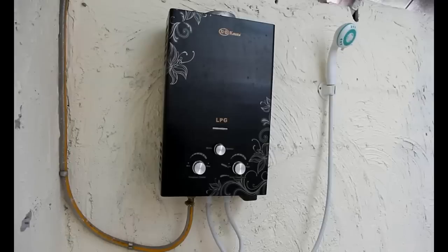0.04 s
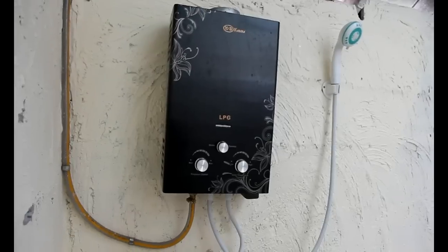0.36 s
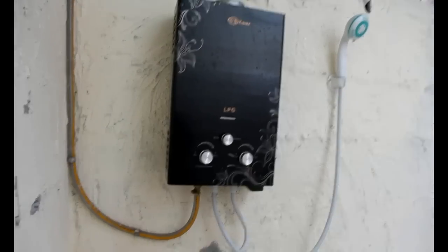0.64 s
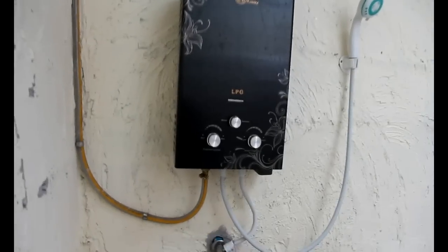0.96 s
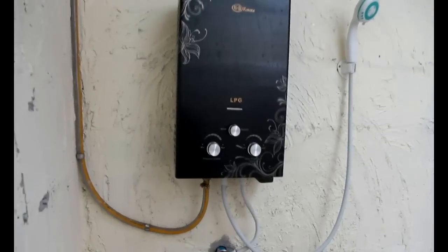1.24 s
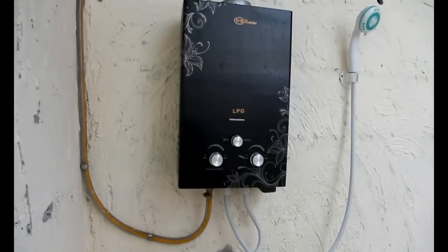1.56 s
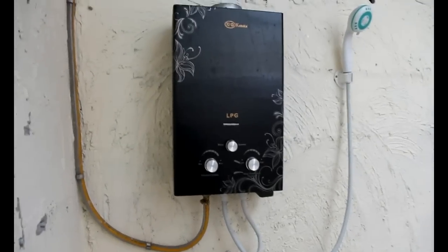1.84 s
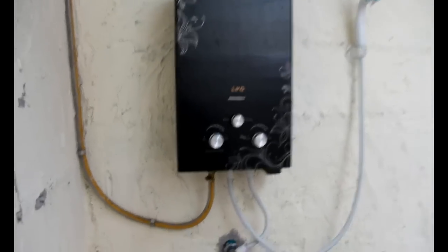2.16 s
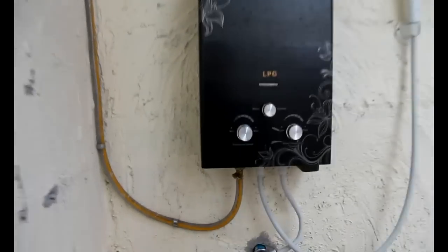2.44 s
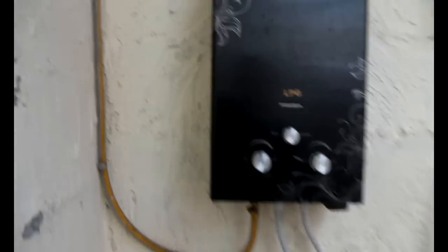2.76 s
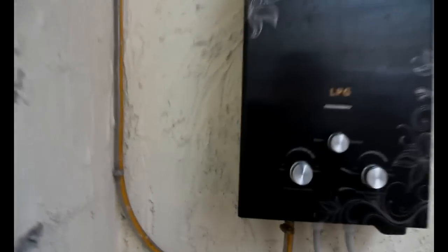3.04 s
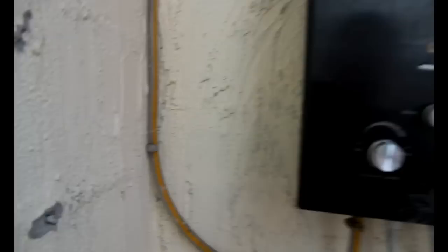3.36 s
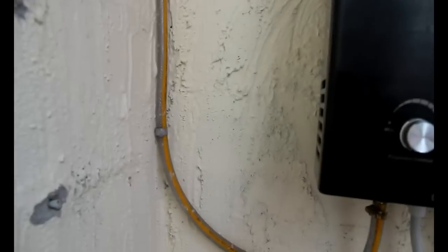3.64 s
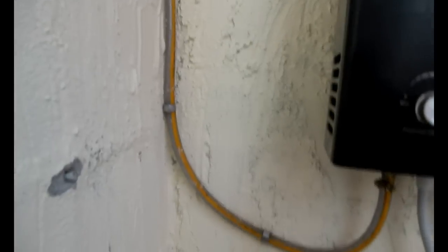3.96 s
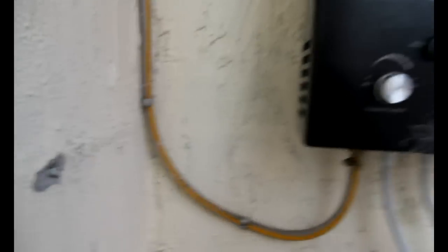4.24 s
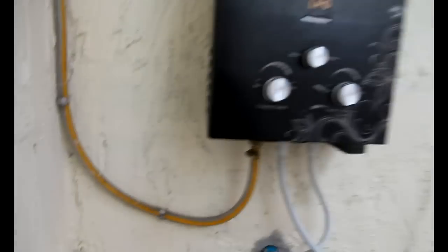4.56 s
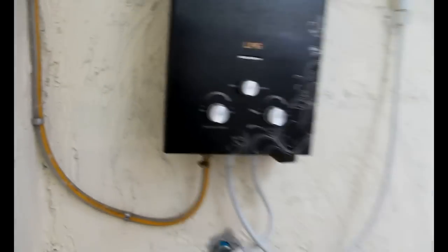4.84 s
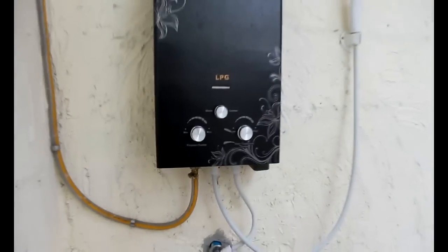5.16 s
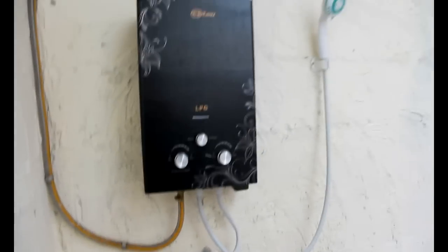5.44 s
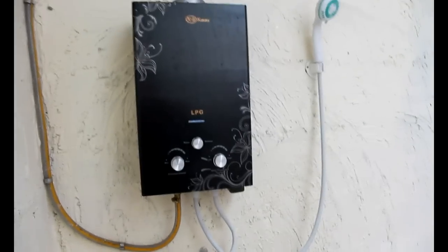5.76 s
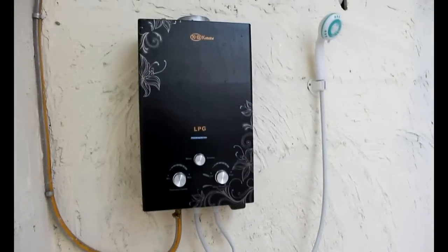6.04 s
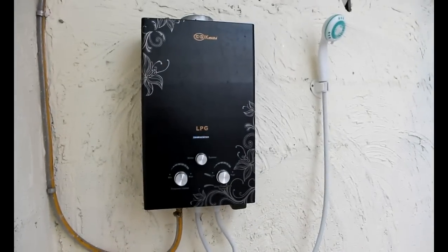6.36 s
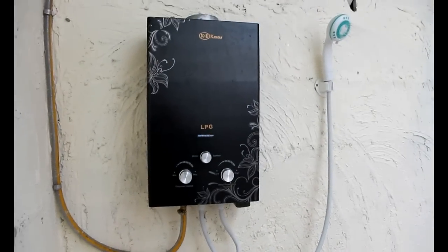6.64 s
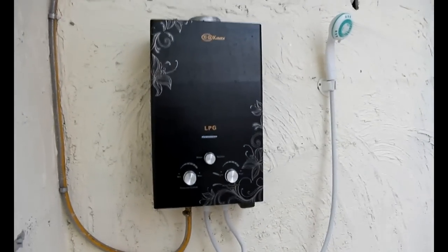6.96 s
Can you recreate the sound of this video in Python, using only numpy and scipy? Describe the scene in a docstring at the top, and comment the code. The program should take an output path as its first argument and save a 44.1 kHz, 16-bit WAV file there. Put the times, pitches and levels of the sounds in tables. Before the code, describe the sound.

In a small bathroom with a short echo, a hand-held microphone picks up faint rustling clothes, light clicks and dull bumps. Halfway through, a tap opens with a knock and water rushes out, splashing and sputtering. A sharp metallic clack comes from a gas water heater, and moments later the burner lights with a hollow whump. The flame rumbles on softly while the water hisses, spits and squeaks with escaping air.

```python
"""A gas water heater lights in a small, hard-walled bathroom: its valve clacks, the gas catches with
a whump, and the flame rumbles on, shaking the air inside the casing. Just before that, a tap knocks
open and water gushes out, then spatters as pockets of air burst from the pipe.
The scene opens with quiet shuffling, ticks and bumps, all heard by a hand-held microphone."""
import sys
import numpy as np
from scipy import signal
from scipy.fft import rfft, irfft
from scipy.io import wavfile
from scipy.ndimage import uniform_filter1d

SR = 44100
rng = np.random.default_rng(int(sys.argv[2]) if len(sys.argv) > 2 else 0)


def wav_record(signal):
    """Record a signal, one row per channel, as 16-bit PCM in the file named by sys.argv[1]."""
    frames = np.transpose(np.atleast_2d(signal))
    bounded = np.clip(frames, -1, 1)
    # unit amplitude maps onto the largest positive 16-bit level
    quanta = np.round(bounded * 32767).astype(np.int16)
    wavfile.write(sys.argv[1], SR, quanta)


N = 317520
TIME, FREQS = np.arange(N) / SR, np.fft.rfftfreq(N, 1 / SR)

# Notes at which the air in the casing and flue (exhaust pipe) rings: pitch_hz, width_hz, level_db
CASING_NOTES = [(31.8, 6.9, -15.5), (78.4, 10.5, -8), (151.7, 8.7, 0.5), (213.8, 6, 4.5), (240.7, 16.4, -2),
                (269, 30, -6.5), (318, 8.2, 2.5), (390.5, 7.2, 0), (429, 9.8, -10.5), (502, 72.3, -17.5)]
# Puffs of gas catching along the burner: start_s, level_db, burn_s
PUFFS = [(5.438, -17, 0.053), (5.5, -22, .03), (5.541, -17, 0.04), (5.72, -36, 0.042)]
# Tone (how strong the lows and highs are) of the flame, a puff's hiss and the flue: pitch_hz, level_db
ROAR_TONE = [(15, -14), (35, 0.5), (420, -7.0), (900, 3), (2500, -10), (8000, -40)]
FLARE_TONE = [(250, -23), (550, 3), (1300, -4), (2500, -7), (8000, -28)]
FLUE_TONE = [(15, -8), (32, -1), (70, -4), (105, 3), (170, -22), (400, -57)]
# Hot gas starting up the flue: start_s, level_db, rise_s, settle_s
DRAUGHT = (5.5, -35.5, 0.03, 0.2)
# Gas valve and tap knocks: start_s, ring_db, fade_s, crack_db, echo_db, rows of (pitch_hz, level_db)
# Here and below, fade_s is the time a sound takes to drop by 60 dB.
VALVE_CLACK = (4.8355, -0.9, 0.042, 0, -2, [(240, -45), (600, -33), (850, -14), (1200, -7), (1750, -3),
               (2400, -2), (3500, -4), (4500, -12.5), (5500, -9), (7500, -15), (11000, -17)])
TAP_KNOCK = (3.668, -29, 0.1, -28, 0, [(120, -43.5), (200, -4), (360, -5.5), (818, -16.5), (935, -2.5),
             (1120, -10), (1240, -8.5), (1380, -13), (2060, -10), (5170, -24), (11000, -21), (14300, -59),
             (22000, -120)])
# Tone of the crack as metal first hits metal: pitch_hz, level_db
CRACK_TONE = [(500, -37), (1500, -9), (4500, -11), (5800, 12), (8000, 6.5), (11000, -8)]
# Tone of water rushing in the pipe, splashing and spraying: pitch_hz, level_db
RUSH_TONE = [(40, -21), (130, -6), (300, 4.5), (520, -3.5), (750, -1), (1150, 1), (1600, -1.5), (2400, -10),
             (5000, -62)]
SPLASH_TONE = [(700, -20), (1300, -14), (1900, -1), (2900, -1.5), (4200, -1.5), (5400, -2.5), (7000, -6.5),
               (11000, -14.5)]
SPRAY_TONE = [(2000, -27.5), (4500, -11), (6300, -6), (8700, -1.5), (10000, -0.2), (11200, -1.5)]
# How each of these three builds up and settles: start_s, steady_db, gush_db, rise_s, halving_s
RUSH_FLOW = (3.81, -41, -33, .12, .075)
SPLASH_FLOW = (3.82, -38, -21.3, .145, .13)
SPRAY_FLOW = (3.92, -30, -21.5, .175, .13)
# The water's loudness drifting as the microphone moves: time_s, rush_and_splash_db, spray_db
WATER_DRIFT = [(4.3, -1.5, 0.5), (4.7, .5, -0.5), (4.95, 1, -3.5), (5.3, -0.5, -1.5), (5.7, 1, .5),
               (6.1, -3, .5), (6.25, -2.5, 4.5), (6.7, -1, 1), (7.2, 1, 0)]
# Air pockets spitting out with the water: start_s, length_s, splash_db, spray_db
SPURTS = [(3.864, .06, -36, -43), (4.313, 0.022, -25.5, -23), (4.384, 0.019, -30, -25.5),
          (4.465, 0.0085, -35, -22.5), (4.511, 0.02, -29.5, -18), (4.667, 0.008, -30.5, -27),
          (4.698, 0.031, -37, -28), (5.001, 0.0337, -32, -25.5), (5.052, 0.0178, -30, -39),
          (5.148, 0.0099, -28, -21), (5.262, 0.0115, -29.5, -22.5), (5.365, 0.036, -32, -22),
          (6.089, 0.0245, -31, -17.5), (6.141, 0.019, -29.5, -19), (6.24, 0.0414, -24.5, -18.5),
          (6.371, 0.051, -28, -29.5), (6.505, 0.02, -49, -22), (6.59, 0.0091, -44, -26),
          (6.703, .025, -49, -28.5), (6.806, 0.039, -60, -27), (6.91, 0.013, -40.5, -30),
          (7.109, 0.02, -27, -38)]
# Bubbles and squeaks of escaping air: start_s, length_s, level_db, pitch_hz, width_hz
SQUEAKS = [(4.513, 0.034, -27, 8680, 600), (5.885, 0.025, -34.5, 2020, 220), (5.957, 0.013, -37, 3300, 300),
           (6.097, .018, -26.5, 9960, 250), (6.152, 0.013, -32, 2153, 300), (6.241, 0.026, -21, 8960, 70),
           (6.262, 0.0144, -18, 8000, 60), (6.265, 0.0104, -43, 2026, 200), (6.372, 0.0154, -27, 4240, 700),
           (6.101, .018, -34, 2650, 600), (6.143, .016, -32, 5100, 450), (6.918, 0.015, -31, 6300, 900),
           (6.621, 0.018, -36, 2200, 500), (6.793, 0.016, -33.5, 2670, 250),
           (7.111, 0.027, -30.5, 3300, 910)]
# Small handling ticks: start_s, peak_db, pitch_hz, half_width_octaves
TICKS = [(0.162, -25.5, 5000, 1.2), (.163, -33, 1440, .4), (.378, -32, 1370, 0.34), (.447, -30, 4300, .5),
         (0.536, -37.5, 5200, .2), (3.486, -39.5, 6970, .35)]
# Soft bumps: start_s, level_db, pitch_hz, fade_s, rattle_db (relative to the thud)
BUMPS = [(0.265, -22, 368, 0.0316, -32), (.811, -31.5, 264, 0.108, -2.5), (.826, -35, 200, 0.08, -5),
         (1.981, -33.5, 243.7, 0.096, -9), (2.357, -26, 232.2, 0.064, -6.5)]
# Notes of the unlit casing: pitch_hz, width_hz, level_db
HUM_NOTES = [(128, 22, -2), (232, 30, 0), (370, 60, -7)]
# The hum swelling while the microphone is near the casing: start_s, length_s, level_db
HUM_SWELL = (2.85, 1.9, -49)
# Movements of clothes and feet: start_s, length_s, level_db
SHUFFLES = [(0.332, 0.35, -47.5), (.73, .2, -46), (.89, .29, -42.5), (1.304, .35, -46), (1.828, .35, -46),
            (2.2, 0.76, -52), (2.98, .5, -49)]
# A sole scuffing the floor: start_s, length_s, level_db, first_hz, last_hz
SCUFF = (1.995, .09, -41.5, 1000, 1950)
# Tone of a bump's rattle, the shuffling and the quiet room: pitch_hz, level_db
RATTLE_TONE = [(60, -4), (150, 10.5), (600, 1), (1400, -6.5), (2100, -1), (3200, -13), (10000, -21.5)]
SHUFFLE_TONE = [(71, -20), (120, -4.5), (303, -14), (339, -8), (477, -9.5), (622, -2), (723, -8),
                (1020, -5), (11000, -21.5), (14300, -61), (22000, -120)]
ROOM_TONE = [(15, -50), (25, -40), (64, 4), (92, -4.5), (115, -1), (412, -10.5), (635, -16.5), (819, -11),
             (954, -19), (1300, -17.5), (1630, -18.5), (2000, -20), (11000, -31), (14300, -72),
             (22000, -120)]
# How long the walls echo: pitch_hz, fade_s
WALL_ECHO = [(100, 0.5), (400, 0.71), (1500, 0.42), (3000, 0.41), (6000, 0.2), (11000, 0.28)]


def burner():
    """Puffs of catching gas make the air in the casing ring; the swirling flame keeps it rumbling."""
    casing = sum(gain_of(db) / (1 + 2j * (FREQS - hz) / width) * (-1) ** k
                 for k, (hz, width, db) in enumerate(CASING_NOTES))
    roar = with_tone(shaped_noise(casing, N), ROAR_TONE)
    roar /= np.sqrt(uniform_filter1d(roar ** 2, size=1800) + 1e-6)  # steady gas keeps the roar even
    light_s = 5.36  # the flame spreads, burns high, then calms down
    flame = gain_of(-44.5) * ramp(light_s, 0.026) + surge(light_s, db=-31.5, rise_s=0.084, settle_s=0.36)
    ringing, burning, t = np.zeros(N), np.zeros(N), np.arange(SR // 2) / SR
    for start_s, puff_db, burn_s in PUFFS:
        onset = gain_of(puff_db) * (1 - np.exp(-t / 0.01))
        notes = sum(gain_of(db) * np.exp(-np.pi * width * t) * np.sin(2 * np.pi * (hz * t + rng.random()))
                    for hz, width, db in CASING_NOTES)
        add(ringing, start_s, gain_of(-3) * onset * notes / np.sqrt(2))
        add(burning, start_s, onset / (1 + (t / burn_s) ** 4))
    whump = ringing + burning * (roar + gain_of(-14.5) * noise(FLARE_TONE))
    bass_cut = signal.butter(2, 123, "high", fs=SR, output="sos")
    return flame * roar + signal.sosfilt(bass_cut, whump)


def flue():
    """Hot gas starts up the flue in deep throbs that soon die away."""
    start_s, _, rise_s, _ = DRAUGHT
    throbs_per_s, depth = 8.3, 0.46
    throb = 1 + depth * np.cos(2 * np.pi * throbs_per_s * (TIME - start_s - rise_s))
    return surge(*DRAUGHT) * throb * noise(FLUE_TONE)


def knock(start_s, ring_db, fade_s, crack_db, echo_db, tone):
    """The valve or tap hits with a sharp crack, and the pipe and sheet metal ring."""
    out, t = np.zeros(N), np.arange(SR // 2) / SR
    ring = gain_of(ring_db - 60 * t / fade_s) * noise(tone, len(t))
    crack = gain_of(crack_db - 60 * t / 0.017) * noise(CRACK_TONE, len(t))
    add(out, start_s, (ring + crack) * (1 - np.exp(-t / 0.0017)))
    return bathroom(out, echo_db)


def water():
    """Water churns in the pipe, splashes and bubbles on the floor, and throws a fine spray."""
    rush = with_tone(patter(per_s=8000, spread_db=2), RUSH_TONE) * waver(rate_hz=20, depth_db=2.5)
    drops = with_tone(patter(per_s=9000, spread_db=0.5), SPLASH_TONE) * waver(rate_hz=28, depth_db=1.9)
    splash = drops + gain_of(-9.5) * bubbles(per_s=820, spread_db=-0.5)
    spray = with_tone(patter(per_s=14000, spread_db=1), SPRAY_TONE) * waver(rate_hz=26, depth_db=1.5)
    times, splash_db, spray_db = np.transpose(WATER_DRIFT)
    stream = flow(*RUSH_FLOW) * rush + flow(*SPLASH_FLOW) * splash
    stream *= gain_of(np.interp(TIME, times, splash_db))
    stream += gain_of(np.interp(TIME, times, spray_db)) * flow(*SPRAY_FLOW) * spray
    return bathroom(stream * waver(rate_hz=21, depth_db=1.17), echo_db=-7)


def flow(start_s, steady_db, gush_db, rise_s, halving_s):
    """The water's strength: a steady stream, plus a gush as the pent-up water arrives."""
    gush_s, opening_s = 3.922, 0.058
    easing = 1 / (1 + (np.maximum(TIME - gush_s - rise_s, 0) / halving_s) ** 2)
    gush = gain_of(gush_db) * ramp(gush_s, rise_s) * easing
    return gain_of(steady_db) * ramp(start_s, opening_s) + gush


def bubbles(per_s, spread_db, sizes=40):
    """Bubbles of many sizes give short pings, each rising a little in pitch."""
    out, t = np.zeros(N), np.arange(SR // 25) / SR
    for hz in np.geomspace(900, 5500, sizes):
        ping = np.sin(2 * np.pi * hz * t * (1 + 3 * t)) * np.exp(-hz * t / 7) * np.sqrt(hz)
        out += signal.oaconvolve(patter(per_s / sizes, spread_db), ping)[:N]
    return unit_level(out)


def spurts():
    """Each air pocket bursts into droplets with a low gulp; some air squeaks on its way out."""
    out, t = np.zeros(N), np.arange(SR // 5) / SR
    hz = np.fft.rfftfreq(len(t), 1 / SR)
    for start_s, length_s, splash_db, spray_db in SPURTS:
        splash = gain_of(splash_db) * with_tone(patter(12000, 0.5, len(t)), SPLASH_TONE)
        spray = gain_of(spray_db) * with_tone(patter(18000, 1.5, len(t)), SPRAY_TONE)
        gulp = gain_of(splash_db - 10) * with_tone(patter(8000, 1.5, len(t)), RUSH_TONE)
        onset = (1 - np.exp(-t / 0.0028)) * (1 + .5 * np.exp(-t / 0.0058))
        add(out, start_s, (splash + spray + gulp) * onset / (1 + (t / length_s) ** 4))
    for start_s, length_s, db, pitch_hz, width_hz in SQUEAKS:
        squeak = shaped_noise(1 / (1 + (2 * (hz - pitch_hz) / width_hz) ** 2), len(t))
        squeak = unit_level(squeak[:max(int(length_s * SR), 64)])
        add(out, start_s, gain_of(db) * squeak * signal.windows.tukey(len(squeak), .4))
    return bathroom(out, echo_db=-3.5)


def handling():
    """Sharp ticks close to the microphone, and dull bumps with a little rattle."""
    ticks, bumps, t = np.zeros(N), np.zeros(N), np.arange(SR // 4) / SR
    octave = np.log2(np.fft.rfftfreq(len(t), 1 / SR) + 1)
    for start_s, db, hz, half_width in TICKS:
        band = 1 / (1 + ((octave - np.log2(hz)) / half_width) ** 2)
        tick = shaped_noise(band, len(t)) * t * np.exp(-t / 0.0015)
        add(ticks, start_s, gain_of(db) * tick / abs(tick).max())
    for start_s, db, hz, fade_s, rattle_db in BUMPS:
        thud = -np.sin(2 * np.pi * hz * t) * gain_of(-60 * t / fade_s)
        rattle = gain_of(rattle_db - 60 * t / 0.2) * noise(RATTLE_TONE, len(t))
        add(bumps, start_s, gain_of(db) * (1 - np.exp(-t / 0.0017)) * (thud + rattle))
    return bathroom(ticks, echo_db=-9) + bathroom(bumps, echo_db=-6)


def casing_hum():
    """Moving air hums faintly in the casing before the flame is lit."""
    casing = sum(gain_of(db) / (1 + (2 * (FREQS - hz) / width) ** 2) for hz, width, db in HUM_NOTES)
    return swell(*HUM_SWELL) * unit_level(shaped_noise(casing, N))


def shuffling():
    """Clothes and feet rustle, and a sole scuffs the floor once, rising in pitch."""
    rustle = with_tone(patter(per_s=14000, spread_db=0), SHUFFLE_TONE) * waver(rate_hz=36, depth_db=0.77)
    fidget = gain_of(-53.5) * (ramp(.15, .03) - ramp(3.45, 0.087))  # faint rustle between movements
    movement = np.sqrt(fidget ** 2 + sum(swell(*row) ** 2 for row in SHUFFLES))
    start_s, length_s, db, first_hz, last_hz = SCUFF
    grit = unit_level(uniform_filter1d(rng.standard_normal(N), size=110))
    pitch_hz = np.interp(TIME, [start_s, start_s + length_s], [first_hz, last_hz])
    scuff = swell(start_s, length_s, db) * grit * np.sin(2 * np.pi * np.cumsum(pitch_hz) / SR)
    return movement * rustle + scuff


def bathroom(sound, echo_db):
    """Adds echoes off close walls. They shift as the microphone moves, and the highs die first."""
    echoes = rng.standard_normal((3, SR)) * (rng.random((3, SR)) < 6000 / SR)
    echoes *= np.arange(SR) > .004 * SR  # sound needs a moment to reach a wall and return
    hz, t, spectrum = signal.stft(echoes, SR, nperseg=256)
    fading = gain_of(-60 * t / look_up(WALL_ECHO, hz)[:, None])
    tails = signal.istft(spectrum * fading, SR, nperseg=256)[1]
    # Blend back and forth between the three echo patterns.
    shares = np.cos(np.pi * (2.3 * TIME + np.linspace(0, 1, 3, endpoint=False)[:, None]))
    room = signal.fftconvolve(sound * shares, tails, axes=1)[:, :N].sum(axis=0)
    return sound + gain_of(echo_db) * room * np.sqrt(2) / np.linalg.norm(tails)


def gain_of(db):
    """Turns decibels into a number to multiply a sound by."""
    return 10 ** (np.asarray(db) / 20)


def unit_level(sound):
    """Scales a sound to an average strength (rms) of 1."""
    return sound / np.sqrt(np.mean(sound ** 2) + 1e-20)


def look_up(table, hz):
    """Reads between a table's rows, with octaves evenly spaced."""
    pitches, values = np.transpose(table)
    return np.interp(np.log(hz + 1), np.log(pitches + 1), values)


def add(mix, start_s, sound):
    """Mixes a sound in at its start time."""
    part = mix[round(start_s * SR):][:len(sound)]
    part += sound[:len(part)]


def with_tone(sound, tone):
    """Shapes a sound's lows and highs by a tone table, at strength 1."""
    hz = np.fft.rfftfreq(len(sound), 1 / SR)
    return unit_level(irfft(rfft(sound) * gain_of(look_up(tone, hz)), len(sound)))


def noise(tone, size=N):
    """Steady noise with the given tone."""
    return with_tone(rng.standard_normal(size), tone)


def shaped_noise(gains, size):
    """Noise with its own gain at each frequency."""
    return irfft(rfft(rng.standard_normal(size)) * gains, size)


def patter(per_s, spread_db, size=N):
    """Tiny hits at random moments; spread_db makes their strengths more uneven."""
    strengths = gain_of(spread_db * np.minimum(rng.exponential(1, size), 4))
    return unit_level(rng.standard_normal(size) * strengths * (rng.random(size) < per_s / SR))


def waver(rate_hz, depth_db):
    """Loudness that wanders at random, up to about rate_hz times a second."""
    return gain_of(depth_db * unit_level(shaped_noise(1 / (1 + (FREQS / rate_hz) ** 4), N)))


def swell(start_s, length_s, db):
    """Loudness that rises and falls in one arch."""
    along = np.clip((TIME - start_s) / length_s, 0, 1)
    return gain_of(db) * (4 * along * (1 - along)) ** 0.645  # a power below 1 steepens both ends


def ramp(start_s, rise_s):
    """A smooth step from 0 to 1."""
    return np.sin(np.pi / 2 * np.clip((TIME - start_s) / rise_s, 0, 1)) ** 2


def surge(start_s, db, rise_s, settle_s):
    """Loudness that builds up, then dies away."""
    dying = np.exp(-np.maximum(TIME - start_s - rise_s, 0) / settle_s)
    return gain_of(db) * ramp(start_s, rise_s) * dying


def scene():
    """Adds every source to the quiet room noise, the same in both channels."""
    mix = gain_of(-48) * noise(ROOM_TONE) + shuffling() + handling()
    mix += knock(*TAP_KNOCK) + knock(*VALVE_CLACK) + water() + spurts()
    mix += burner() + flue() + casing_hum()
    return np.array([mix, mix])


def record(dry):
    """Starts after a brief silence, turns loud peaks down and cuts the highest treble."""
    limit_db, recovery_db_per_s, top_hz = -10.5, 200, 11240
    fade_in = np.clip((TIME - .088) / .005, 0, 1)
    power_db = 10 * np.log10(abs(uniform_filter1d(dry[0] ** 2, size=130)) + 1e-12)
    recovery_db = TIME * recovery_db_per_s
    held_peak_db = np.maximum.accumulate(power_db + recovery_db) - recovery_db
    over_db = np.maximum(held_peak_db - limit_db, 0)
    limited = fade_in * dry / gain_of(uniform_filter1d(over_db, size=60))
    treble_cut = signal.firwin(601, top_hz, window=("kaiser", 8), fs=SR)
    return signal.oaconvolve(limited, treble_cut[None], "same")


dry = scene()
out = record(dry)
wav_record(out)
```